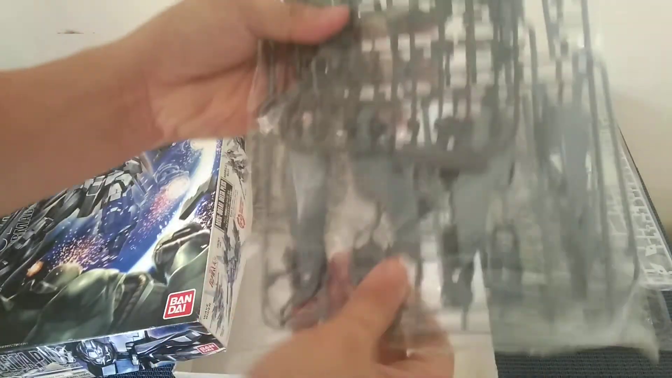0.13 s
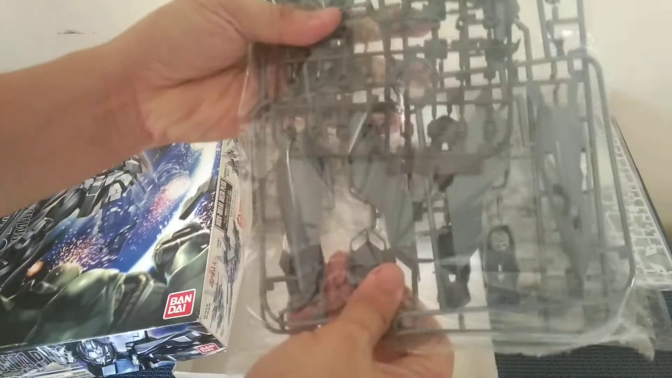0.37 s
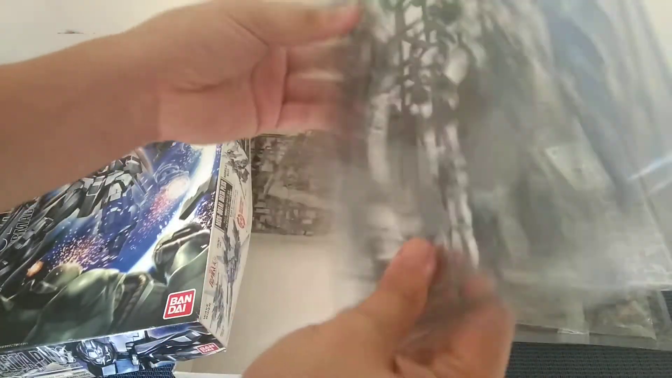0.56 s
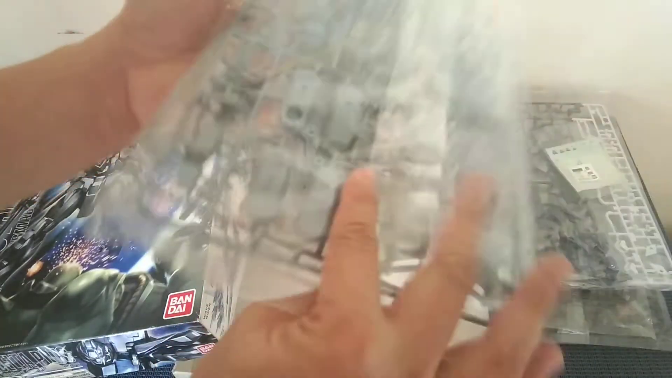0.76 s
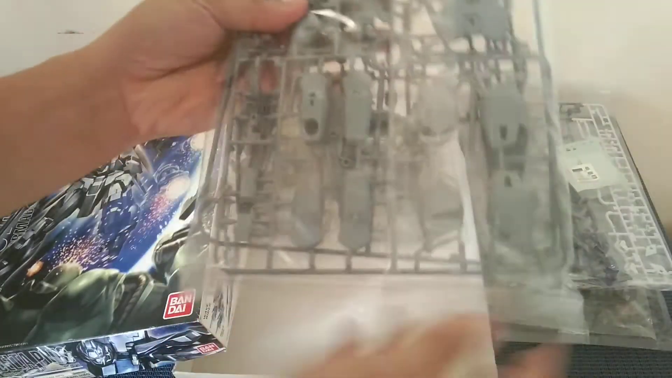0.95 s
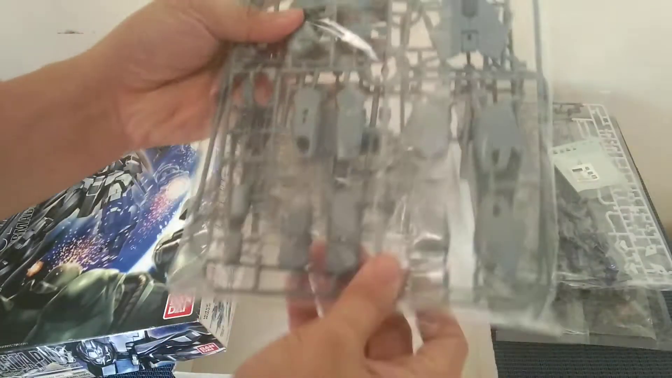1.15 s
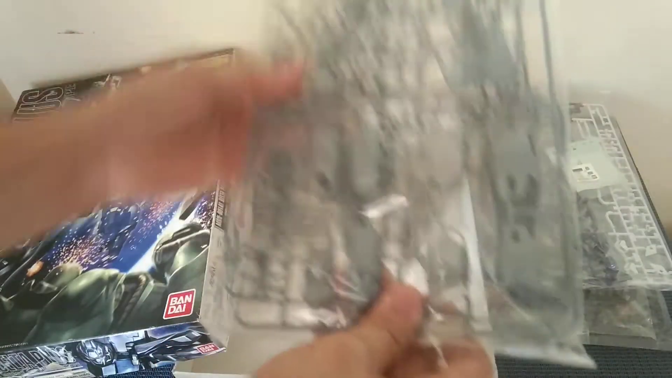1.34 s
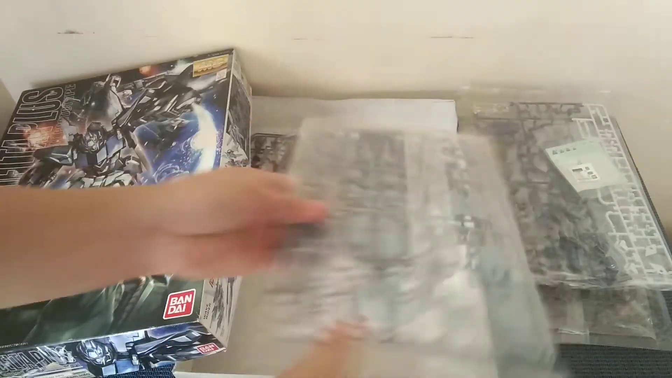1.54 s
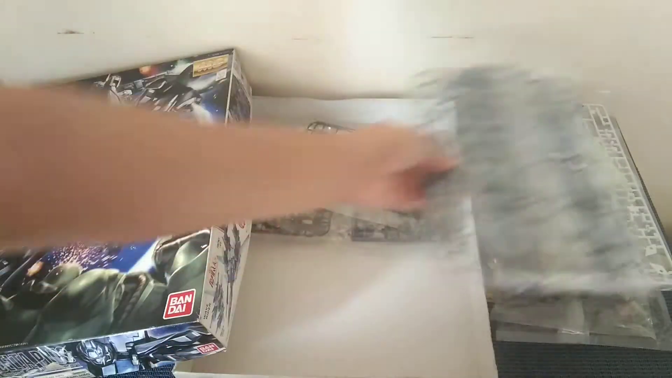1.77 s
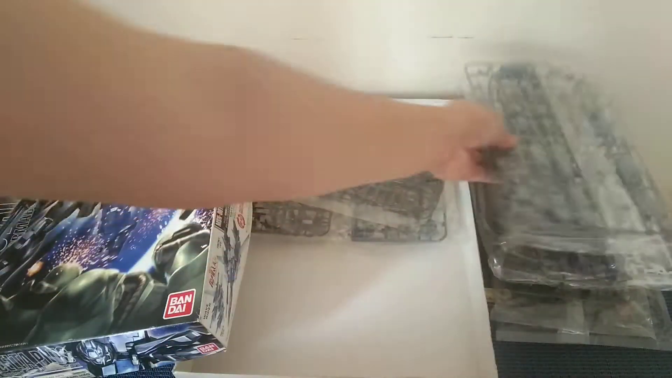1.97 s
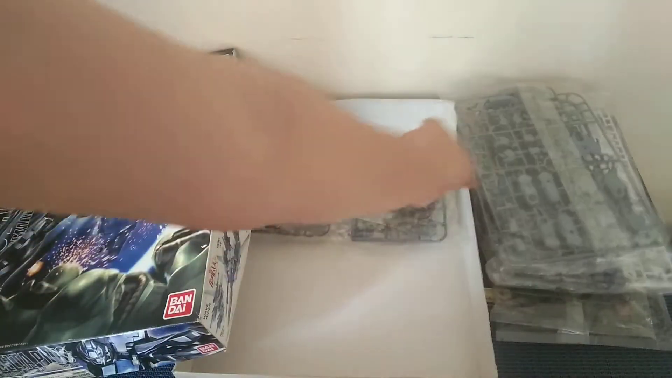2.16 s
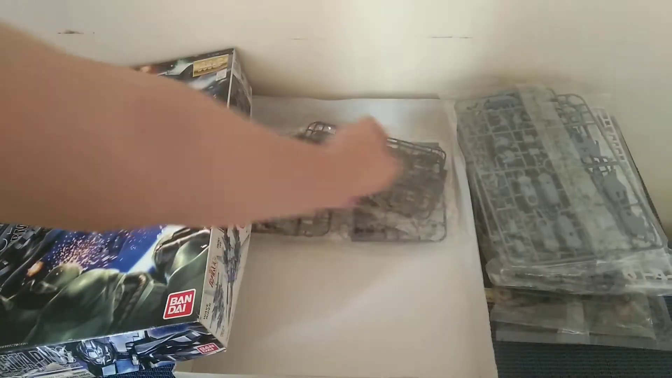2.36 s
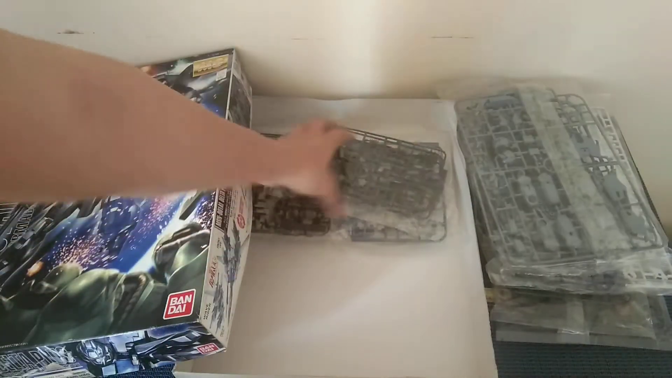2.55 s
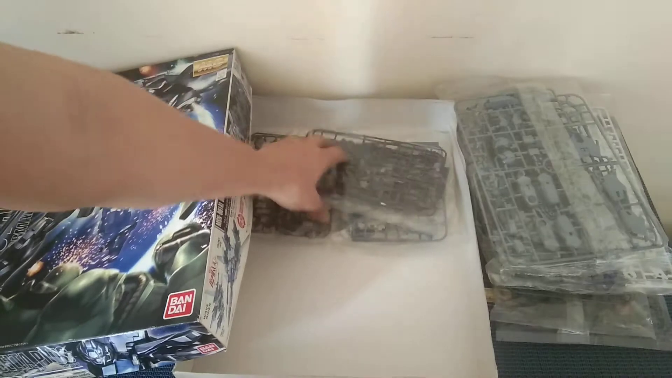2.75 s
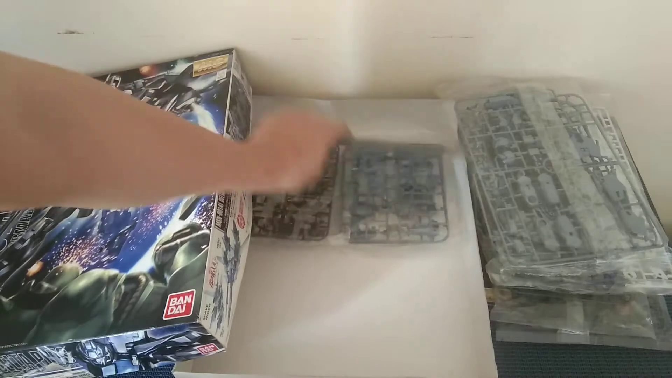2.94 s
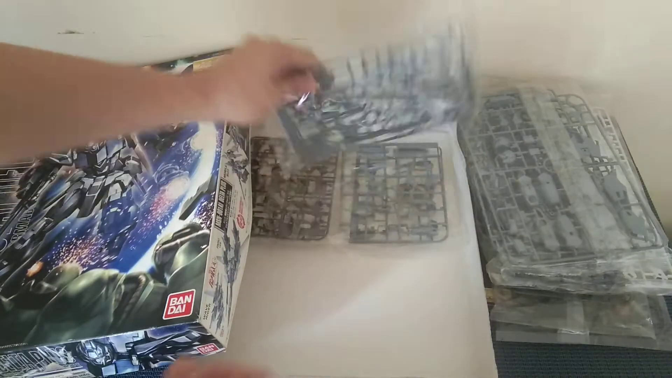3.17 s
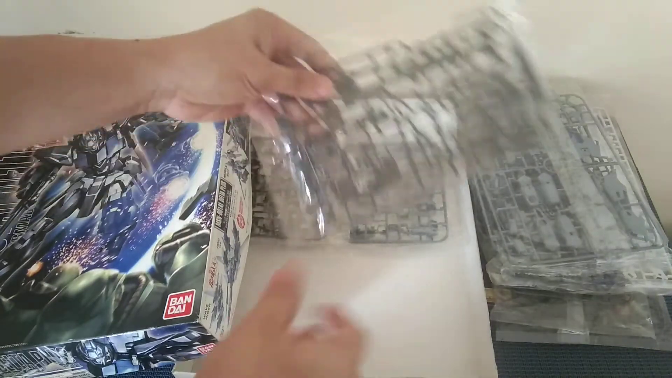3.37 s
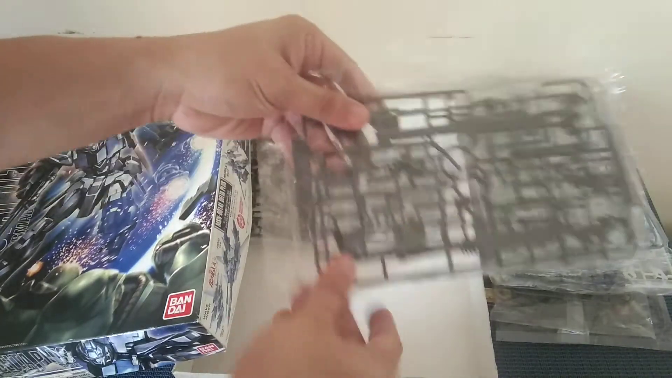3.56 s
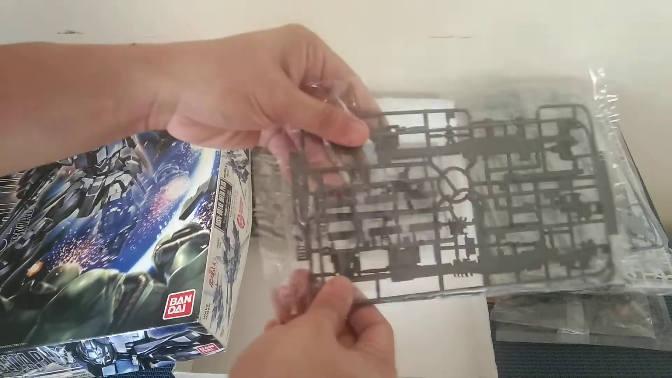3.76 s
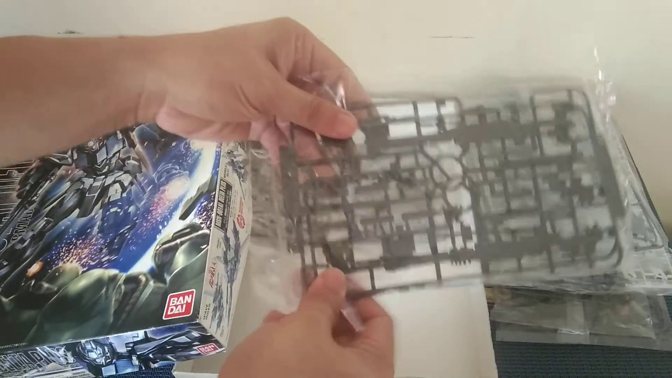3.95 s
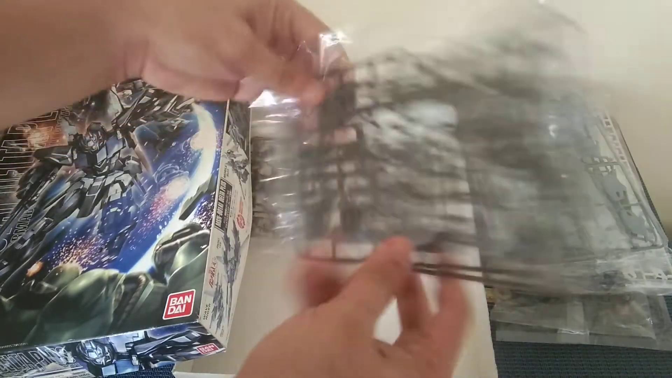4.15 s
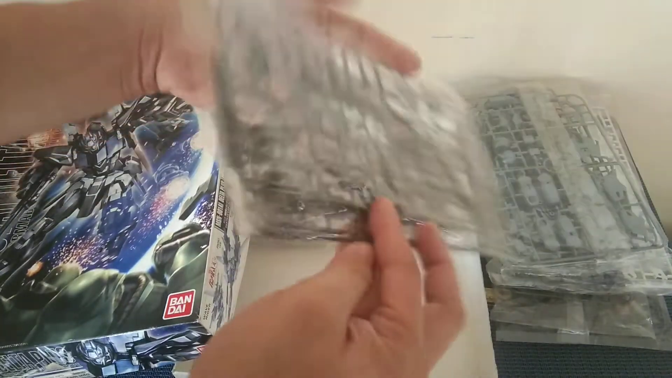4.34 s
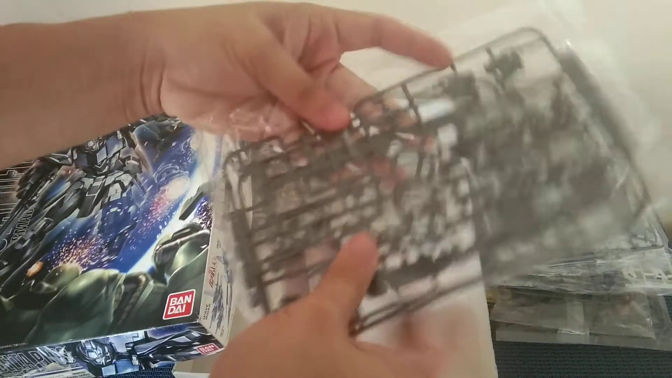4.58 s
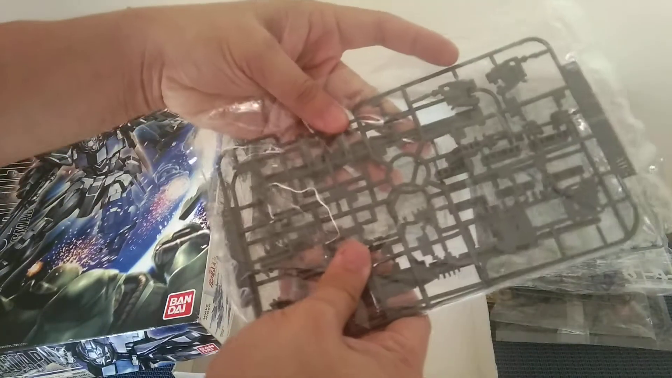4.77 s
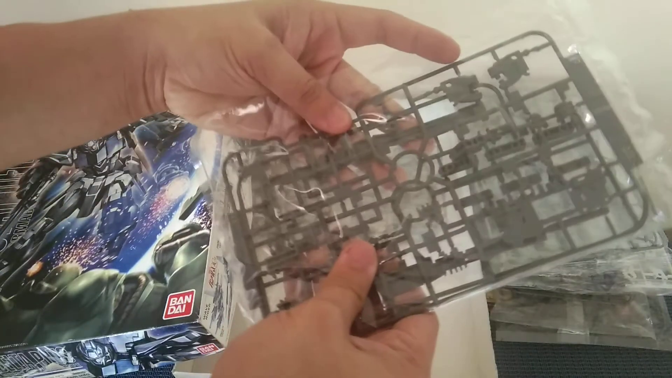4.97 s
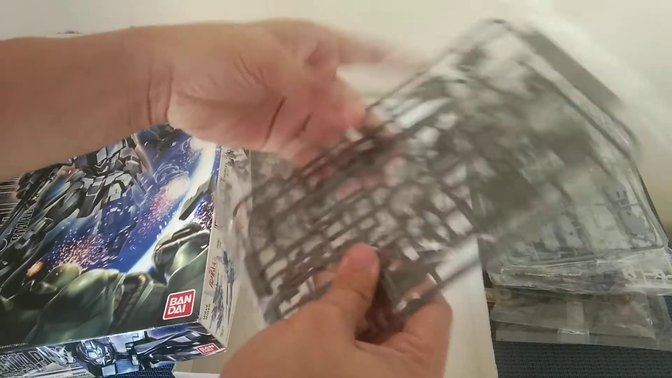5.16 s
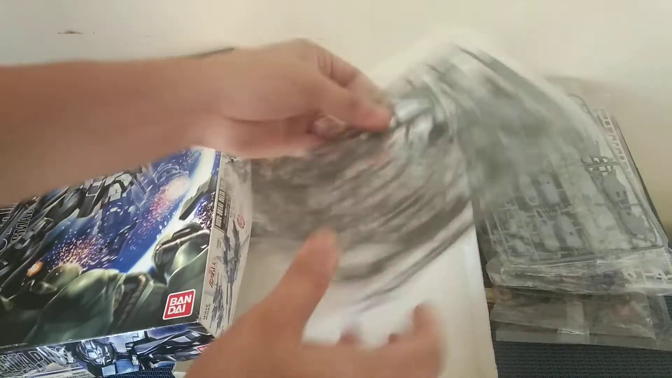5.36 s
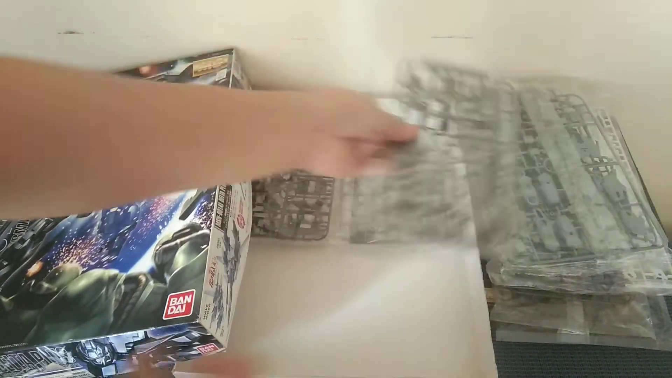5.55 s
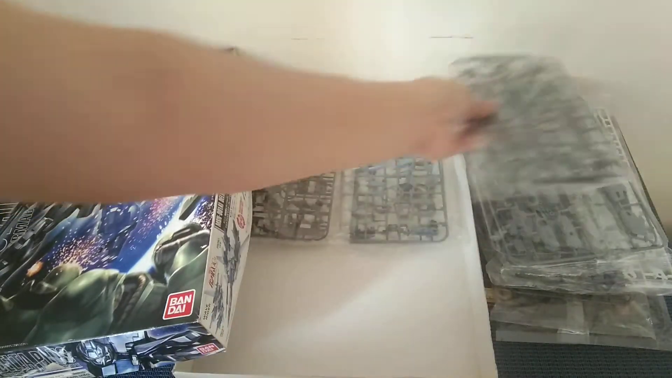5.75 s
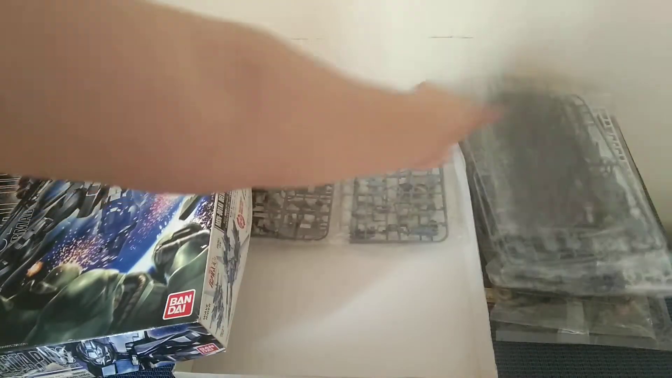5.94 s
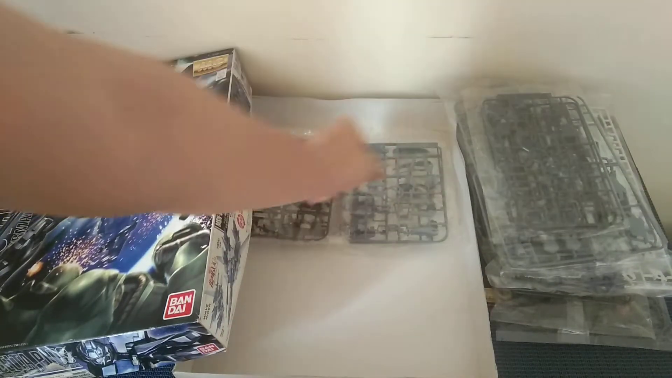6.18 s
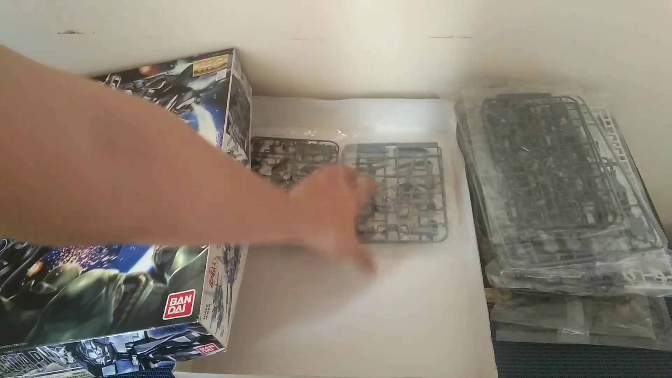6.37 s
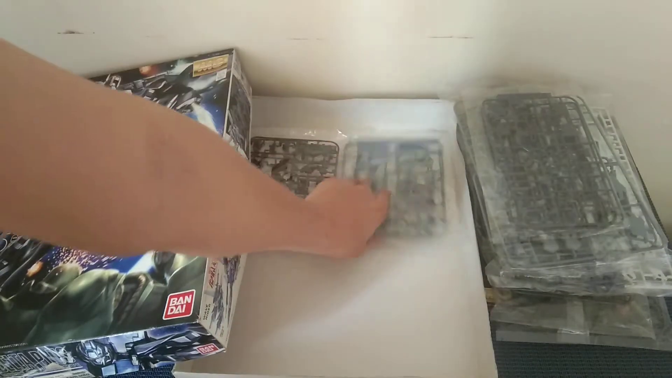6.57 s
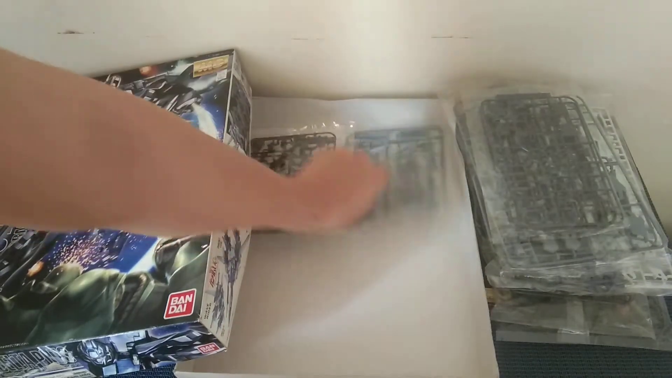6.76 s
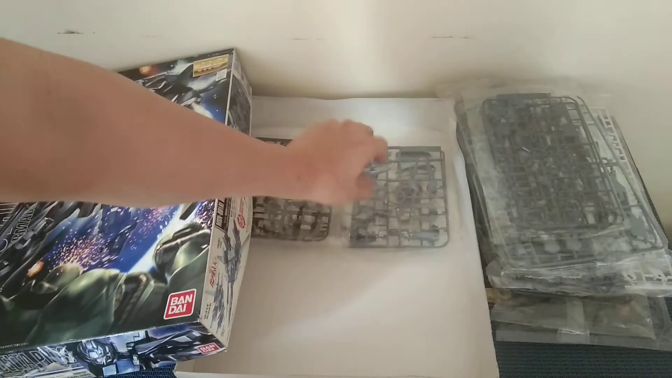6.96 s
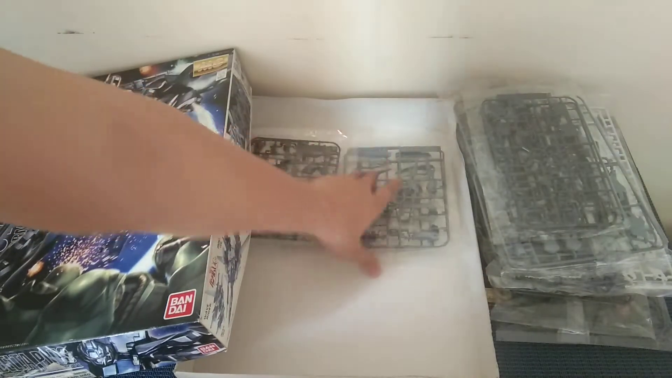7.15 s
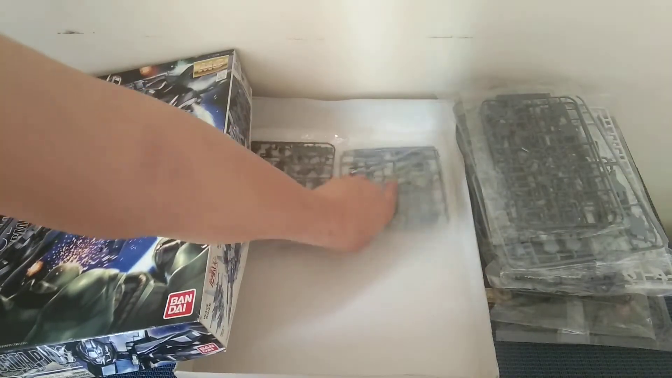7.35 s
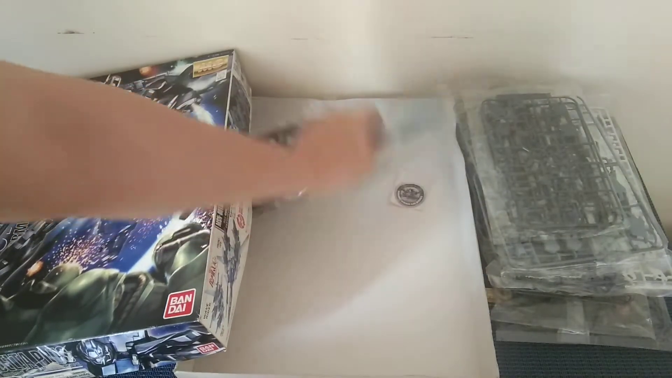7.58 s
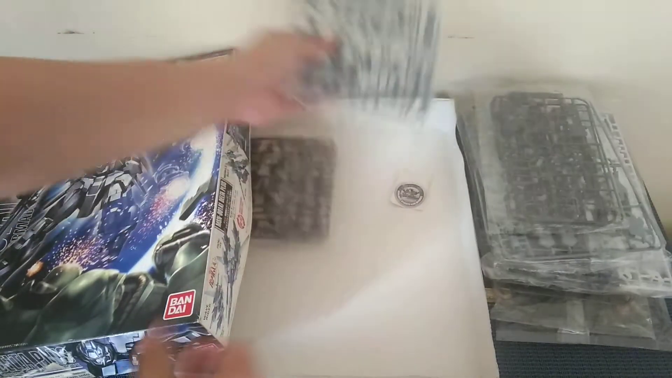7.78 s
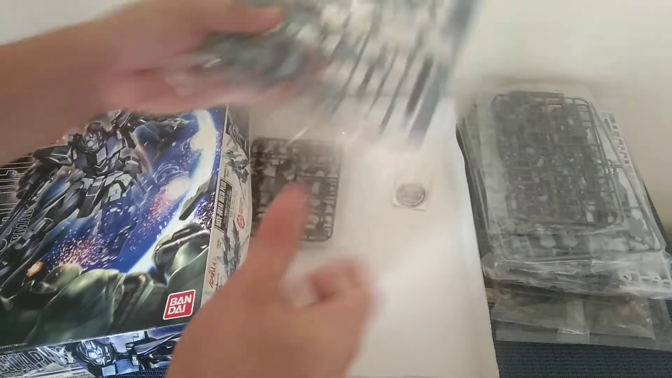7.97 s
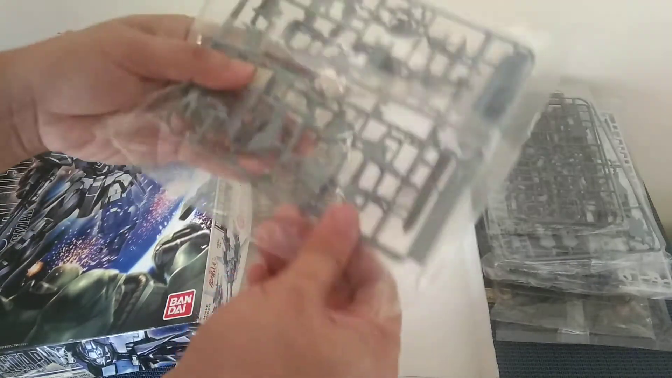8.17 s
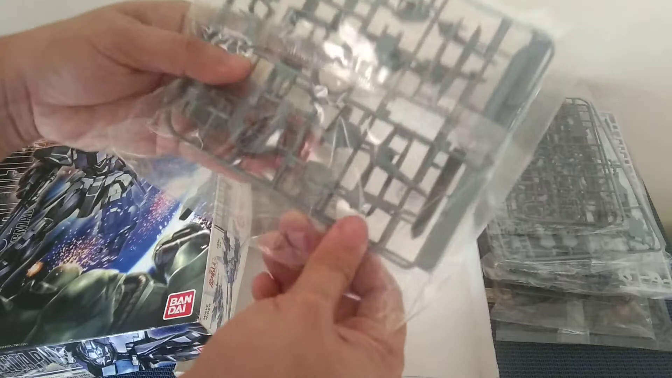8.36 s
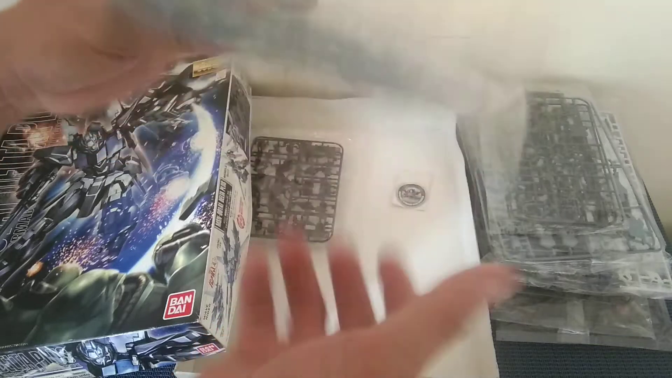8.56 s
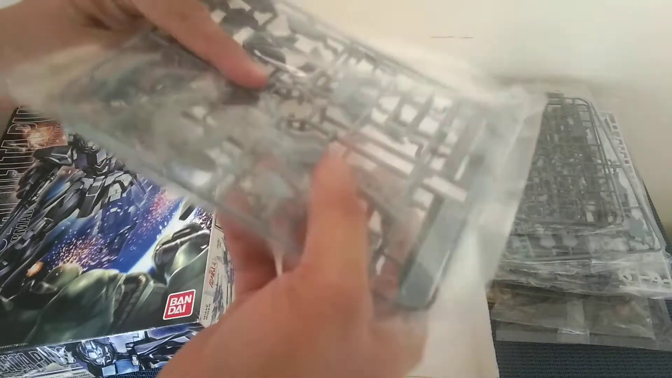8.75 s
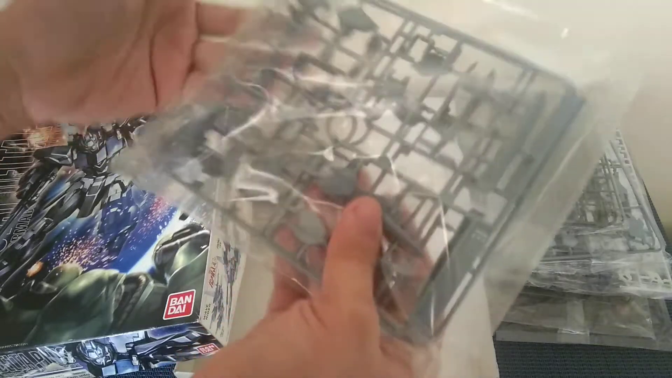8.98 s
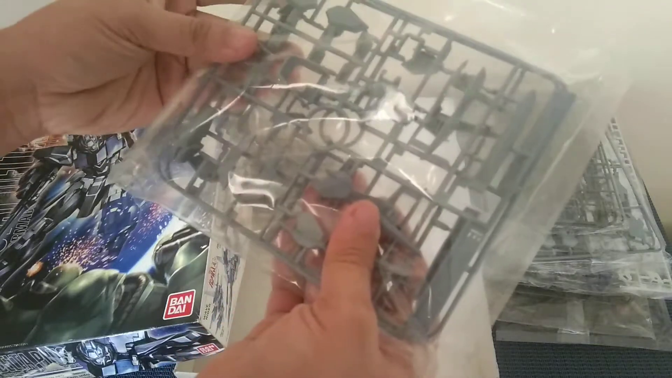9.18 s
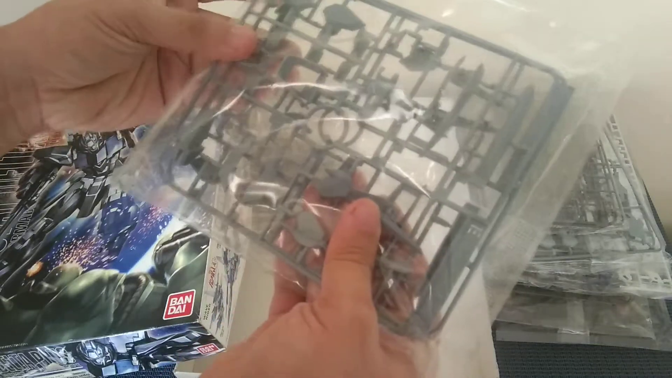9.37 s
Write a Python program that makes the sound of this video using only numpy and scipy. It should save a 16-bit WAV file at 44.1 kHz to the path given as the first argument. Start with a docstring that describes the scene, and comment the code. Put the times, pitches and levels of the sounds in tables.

```python
"""Sharp snaps and dense crackle of thin film: plastic bags of part frames lifted, turned, stacked on a table.
Film: random clicks ring small patches; big creases snap at set pitches and set off dying swarms of buckles.
Frames: dense, dull grains follow the film's level. Landings: low tones and noise, a few cycles long.
Below: a steady murmur of filtered noise. A small room adds a noise tail and low standing waves;
a close small microphone adds hiss, soft limiting and band limits; its treble resonance is in the film's spectrum."""
import sys
import numpy as np
from scipy import signal
from scipy.fft import rfft, irfft
from scipy.io import wavfile

SR = 44100
rng = np.random.default_rng(int(sys.argv[2]) if len(sys.argv) > 2 else 0)


def pcm_store(signal):
    """Save signal as 16-bit PCM."""
    levels = np.round(np.clip(np.atleast_2d(signal), -1, 1) * 32767)
    wavfile.write(sys.argv[1], SR, levels.astype(np.int16).T)


N = 415422

# Source levels apply ahead of echoes, room and microphone.
# Steady room murmur, spectrum: (frequency [Hz], relative level [dB])
MURMUR_SPECTRUM = [(18, -20), (30, -10), (134, -4), (184, -11.5), (215, -12.5), (384, -19), (473, -12),
                   (540, -17), (600, -10.5), (1630, -10.5), (2170, -13), (2980, -12.5), (3400, -13),
                   (6720, -15), (16000, -70)]
# Standing waves of the room: (frequency [Hz], width [Hz], gain over direct sound [dB])
ROOM_MODES = [(134.6, 9.7, -1), (219, 2.4, 5), (260.3, 14, 1.5), (361.7, 15, -5.5)]
# Reflections off frames, table and wall: (delay [s], gain over direct sound [dB])
NEAR_ECHOES = [(.0004, -44), (.0009, -28), (.0016, -14), (.0025, -19.5)]
# Bags and hands landing: (time [s], peak [dB], pitch [Hz])
THUDS = [(0.128, -29, 205), (0.479, -32, 250), (0.71, -31, 198), (1.127, -39, 275), (1.503, -42, 260),
         (2.067, -45, 120), (2.075, -32, 850), (2.768, -39, 153), (4.428, -39, 205), (4.641, -35, 181),
         (5.992, -44, 259), (6.003, -29, 830), (7.798, -38, 135), (7.812, -27, 524), (7.917, -40, 132),
         (8.091, -34, 266), (8.175, -43, 108), (8.367, -39, 95), (8.431, -34, 200), (8.454, -30.5, 94),
         (8.622, -38, 99), (8.771, -32, 240), (8.902, -37, 80.7), (9.08, -37, 287)]
# Plastic frames knocking, spectrum: (frequency [Hz], relative level [dB])
FRAME_SPECTRUM = [(24, -53), (40, -11.5), (86, 1), (172, -2.5), (258, -2.5), (304, 0.5), (365, 1.5),
                  (474, -1), (912, 2.5), (2000, -4.5), (2600, -11), (4400, -120)]
# Film through the microphone, spectrum: (frequency [Hz], relative level [dB])
FILM_SPECTRUM = [(530, -37.5), (900, -8), (1400, -11.5), (2830, -7), (3430, -5), (4920, -5.5), (6890, 0),
                 (7400, -3.5), (9000, -18), (11400, -29), (12800, -32.5), (14500, -25), (17000, -28)]
# A bag gripped, turned or put down:
# (start [s], end [s], crackle at start [dB], crackle at end [dB], extra frame knock [dB])
MOVES = [(0.0, 0.06, -40.5, -52, -2), (0.138, 0.25, -27, -41, -1), (0.443, 0.972, -37, -30, 1.7),
         (1.097, 1.53, -36.5, -32.5, -0.8), (1.52, 1.81, -36.5, -59.5, -6), (2.05, 2.147, -43, -34, 1),
         (2.638, 2.743, -48, -36.5, 1.5), (2.771, 3.36, -35, -50.5, -0.2), (3.575, 3.793, -50.5, -60, 7),
         (3.963, 4.253, -53.5, -44, 1), (4.321, 4.498, -42.5, -34, 0.3), (4.58, 4.72, -48, -51, 6.5),
         (5.018, 5.455, -50, -50, 3.5), (5.976, 6.041, -32, -34, 3), (6.46, 6.533, -62, -47.5, 9),
         (6.545, 6.711, -40, -31, -1.1), (6.769, 6.828, -32, -26, 1.9), (7.19, 7.704, -35, -32.5, 0.5),
         (7.8, 7.871, -29.5, -35.5, 5.5), (7.9, 8.06, -41.5, -45, 2.5), (8.1, 8.353, -29.5, -41, -1),
         (8.431, 8.596, -28.5, -34.5, -3.5), (8.643, 8.955, -34, -30.5, -1.5),
         (8.995, 9.246, -32, -52, -2.5), (9.404, 9.424, -42, -19.5, 1)]
# A fold of film crushed at once: (time 42 % into it [s], top of swell [dB], length [s])
CRUNCHES = [(0.142, -14.5, 0.025), (0.554, -27, 0.02), (0.578, -31, 0.013), (0.628, -31, 0.011),
            (0.664, -24.5, 0.025), (0.738, -21.5, 0.13), (0.86, -23, 0.093), (0.941, -24, 0.044),
            (1.002, -23, 0.03), (1.156, -24, 0.071), (1.311, -28, 0.014), (1.378, -33, 0.0098),
            (1.482, -25.5, 0.03), (2.018, -39.5, 0.056), (2.096, -27.5, 0.15), (2.624, -37, 0.053),
            (2.79, -34.5, 0.06), (2.835, -49, 0.012), (2.884, -31, 0.017), (3.18, -37, 0.019),
            (3.252, -36.5, 0.034), (3.298, -33, 0.03), (3.702, -46.5, 0.11), (4.464, -33, 0.025),
            (4.655, -36.5, 0.043), (5.237, -38.5, 0.033), (5.983, -32, 0.02), (6.006, -24.5, 0.038),
            (6.555, -34, 0.042), (6.59, -27.5, 0.067), (6.648, -29, 0.084), (6.776, -24, 0.012),
            (6.786, -19, 0.035), (7.2, -51, 0.046), (7.298, -21.5, 0.047), (7.381, -22, 0.023),
            (7.428, -37, 0.0087), (7.559, -27.5, 0.028), (7.613, -26, 0.024), (7.657, -34, 0.099),
            (7.806, -24, 0.03), (7.983, -36, 0.0071), (8.103, -26, 0.031), (8.147, -24, 0.014),
            (8.227, -25, 0.022), (8.477, -23.5, 0.023), (8.658, -24, 0.015), (8.714, -26.5, 0.037),
            (8.802, -20, 0.096), (8.926, -16.5, 0.03), (9.093, -24, 0.014)]
# Big creases snapping: (time [s], peak [dB], pitch [Hz])
SNAPS = [(0.1225, -9, 6300), (0.131, -10, 6680), (0.142, -22, 7560), (0.232, -17, 7840),
         (0.2973, -17, 6460), (0.337, -25, 3540), (0.439, -35, 7020), (0.454, -27, 4330),
         (0.475, -19, 7200), (0.483, -14, 6230), (0.4965, -9.5, 6370), (0.53, -10, 6330),
         (0.5557, -9, 6000), (0.5699, -5.5, 5960), (0.619, -13, 6120), (0.6342, -4, 4130),
         (0.656, -8, 7110), (0.698, -9, 6350), (0.753, -14, 7450), (0.8285, -17, 3530), (0.862, -8, 5990),
         (0.9148, -18, 4780), (0.9333, -13, 7150), (0.9628, -11, 4450), (0.997, -10, 7100),
         (1.119, -23, 2580), (1.187, -10, 7410), (1.229, -15, 3880), (1.378, -18, 5170),
         (1.4035, -22, 4520), (1.4651, -7, 6760), (1.4852, -6.5, 3700), (1.5048, -9, 7970),
         (1.6417, -21.5, 3080), (1.733, -22.5, 6000), (1.7876, -27, 6760), (1.9993, -19, 7670),
         (2.0314, -21, 3400), (2.047, -13, 6500), (2.453, -37, 6500), (2.5303, -21.5, 4400),
         (2.61, -17, 4470), (2.618, -18, 8000), (2.702, -20, 6700), (2.9876, -16, 4000),
         (3.0158, -14.5, 6400), (3.0398, -15.5, 4340), (3.0966, -29, 2500), (3.1773, -25, 7060),
         (3.2246, -18.5, 5680), (3.3116, -17, 7200), (3.3534, -26, 6250), (3.4239, -31, 5300),
         (3.4434, -25.5, 5430), (3.567, -23, 5100), (3.6817, -27, 4010), (3.6928, -19, 3860),
         (3.7263, -25, 2870), (3.7765, -22, 1550), (3.8855, -33.5, 3450), (3.967, -30, 1560),
         (4.067, -33, 6000), (4.1387, -18, 6930), (4.176, -17.5, 7040), (4.3462, -11.5, 6200),
         (4.4034, -23, 6270), (4.4219, -18, 4690), (4.4762, -14.5, 7600), (4.598, -23, 4690),
         (4.6268, -22.5, 3020), (4.7122, -22, 6350), (5.0767, -31, 6370), (5.181, -25.5, 7020),
         (5.3342, -22, 5680), (5.4545, -24.5, 6030), (5.8677, -25, 4340), (5.9723, -11.5, 7540),
         (6.558, -23.5, 1470), (6.59, -18, 1580), (6.629, -15, 1580), (6.6903, -9.5, 6800),
         (6.7715, -25, 3830), (6.7885, -11, 4000), (7.182, -31, 5560), (7.2472, -14.5, 3360),
         (7.269, -17.5, 1500), (7.4134, -16, 4650), (7.4266, -6, 6070), (7.469, -9.5, 3630),
         (7.485, -5, 6460), (7.574, -11, 5800), (7.6003, -15, 7500), (7.6079, -11, 7200),
         (7.641, -12, 6160), (7.6735, -14, 6050), (7.697, -18, 7400), (7.8609, -17, 4500),
         (7.9808, -16, 6030), (8.005, -18.5, 3120), (8.066, -21, 6850), (8.1038, -14, 7750),
         (8.115, -12, 6800), (8.1537, -10, 6630), (8.2037, -15, 3880), (8.228, -17, 4610),
         (8.2382, -13, 6550), (8.266, -13.5, 6330), (8.414, -16, 8180), (8.437, -14, 9100),
         (8.5127, -6.5, 7300), (8.5497, -14.5, 5600), (8.658, 4.5, 6960), (8.6602, -6.5, 3370),
         (8.671, -9, 7490), (8.7459, -13, 6460), (8.794, -6, 7580), (8.835, -6.5, 3550),
         (8.847, -6.5, 6460), (8.8697, -6, 6070), (8.9224, -13, 6760), (9.0492, -30, 3720),
         (9.087, -16, 6630), (9.1598, -14, 6100), (9.1998, -24, 2950), (9.275, -20.5, 7100),
         (9.3838, -21.5, 6250)]

MURMUR_DB = -52
ROOM_T60_S, ROOM_DB, ROOM_DULL_HZ = 0.39, -10.5, 10200
MIC_HISS_DB, MIC_STOPBAND_HZ = -88, 16200
USUAL_DB = -35   # crackle level of an ordinary grip
RISE_DB_PER_S, SETTLE_DB_PER_S = 1200, 183   # crackle slopes outside a move
# Frames: level at USUAL_DB, dB followed per dB of film level, constant faint rub
KNOCK_DB, KNOCK_DB_PER_DB, KNOCK_REST_DB = -47, 0.91, -54.5
BUCKLES_PER_S, THINNING_DB_PER_DB = 2000, 0.36   # nominal rate at USUAL_DB; how it follows the level
POPS_PER_S, POPS_RE_FILM_DB = 150, -6.5   # middling creases
CASCADE_T60_S, CASCADE_RE_SNAP_DB = 0.032, -15.5


def from_db(db):
    """Decibels to amplitude ratio."""
    return 10 ** (np.asarray(db) / 20)


def rms_one(x):
    """Scale to rms 1."""
    return x / np.sqrt(np.mean(x ** 2) + 1e-20)


def causal_response(spectrum, size=8192):
    """Minimum-phase impulse response of a spectrum, by folded cepstrum."""
    hz, level_db = np.transpose(spectrum)
    grid_hz = np.arange(size // 2 + 1) * SR / size + 1
    grid_db = np.interp(np.log(grid_hz), np.log(hz), level_db)
    cepstrum = irfft(np.log(from_db(grid_db)))
    cepstrum[1:size // 2] *= 2
    cepstrum[size // 2 + 1:] = 0
    return irfft(np.exp(rfft(cepstrum)))


def colour(x, spectrum):
    """Filter to a spectrum."""
    return signal.oaconvolve(x, causal_response(spectrum))[:N]


def drift(rate_hz):
    """Slow random wander, rms 1: noise through a double one-pole low-pass."""
    r = np.exp(-2 * np.pi * rate_hz / SR)
    noise = rng.standard_normal(N + SR)
    return rms_one(signal.lfilter([1], [1, -2 * r, r * r], noise)[SR:])   # first second: run-in


def resonate(x, hz, cycles):
    """Two-pole resonance: falls 60 dB in the given cycles, gain about 1 on top."""
    r, w = from_db(-60 * hz / (cycles * SR)), 2 * np.pi * hz / SR
    gain = (1 - r * r) / 2
    return signal.lfilter([gain, 0, -gain], [1, -2 * r * np.cos(w), r * r], x + 1e-18)


def grains(per_s, spread_db, clump_db, clump_hz):
    """Random clicks, few large among many small, in clumps; rms 1."""
    sizes = from_db(spread_db * np.minimum(rng.exponential(1, N), 5))
    signs = rng.choice([-1, 1], N)
    chance = per_s * from_db(clump_db * drift(clump_hz)) / SR
    return rms_one(sizes * signs * (rng.random(N) < chance))


def murmur():
    """Steady air and distant machinery: filtered noise, wavering a little."""
    level = from_db(MURMUR_DB + 0.5 * drift(3.2))
    return level * rms_one(colour(rng.standard_normal(N), MURMUR_SPECTRUM))


def standing_waves(x):
    """The small room rings on at a few low pitches."""
    ringing = 0
    for hz, width_hz, gain_db in ROOM_MODES:
        cycles = np.log(1000) * hz / (np.pi * width_hz)
        ringing = ringing + from_db(gain_db) * resonate(x, hz, cycles)
    return x + ringing


def room(x):
    """Dense reflections: four decaying noise tails, fed in shares that cycle at fixed rates."""
    t = np.arange(SR // 2) / SR
    phase = 2 * np.pi * 1.3 * np.arange(N) / SR
    dull = signal.butter(1, ROOM_DULL_HZ, fs=SR)
    out = 0
    for share in (np.sin(phase), np.cos(phase), np.sin(1.7 * phase), np.cos(1.7 * phase)):
        tail = rng.standard_normal(len(t)) * from_db(-60 * t / ROOM_T60_S) * (t > 0.003)
        tail = signal.lfilter(*dull, tail)
        tail /= np.sqrt(2 * np.sum(tail ** 2))   # squared shares sum to 2
        out = out + signal.oaconvolve(x * share, tail)[:N]
    return out


def near_echoes(x):
    """Surfaces close to the bag turn each click into a short burst; tap energy 1."""
    taps = np.zeros(256)
    taps[0] = 1
    for k, (delay_s, gain_db) in enumerate(NEAR_ECHOES):
        taps[round(delay_s * SR)] = from_db(gain_db) * (-1) ** k
    return signal.oaconvolve(x, taps / np.sqrt(np.sum(taps ** 2)))[:N]


def thuds():
    """A soft landing pushes air for a few uneven cycles: sine plus resonant noise."""
    out, t = np.zeros(N + SR), np.arange(SR // 4) / SR
    for time_s, peak_db, hz in THUDS:
        noise = rng.standard_normal(len(t))
        uneven = 0.48 * rms_one(resonate(noise, hz, cycles=2.1))
        envelope = t * from_db(-60 * t * hz / 7.7)
        push = (np.sin(2 * np.pi * hz * t) + uneven) * envelope
        out[round(time_s * SR):][:len(t)] += from_db(peak_db) * push / np.abs(push).max()
    return out[:N]


def frames(busy_db, extra_db):
    """The frames rub and tap each other as the film moves: duller, denser grains."""
    taps = grains(2500, spread_db=3.0, clump_db=3.0, clump_hz=25.0)
    knock_db = KNOCK_DB + extra_db + KNOCK_DB_PER_DB * (busy_db - USUAL_DB)
    level = np.hypot(from_db(knock_db), from_db(KNOCK_REST_DB))
    return level * rms_one(colour(taps, FRAME_SPECTRUM))


def handling():
    """Crackle and extra knock [dB]: moves rise, hold course, settle; the loudest one counts."""
    t = np.arange(N) / SR
    levels = []
    for start, end, start_db, end_db, _ in MOVES:
        times = [start - 1, start, end, end + 1]
        course_db = [start_db - RISE_DB_PER_S, start_db, end_db, end_db - SETTLE_DB_PER_S]
        levels.append(np.interp(t, times, course_db))
    levels = np.array(levels)
    return levels.max(axis=0), np.array(MOVES)[levels.argmax(axis=0), -1]


def film_patches(clicks, cycles, patch_db):
    """Each click has a plain edge plus the ring of one patch of film, large or small."""
    pitches_hz = np.geomspace(1300, 10000, 12)
    dealt = rng.integers(0, 12, N)
    rings = sum(resonate(clicks * (dealt == k), hz, cycles) for k, hz in enumerate(pitches_hz))
    return colour(clicks + from_db(patch_db) * rings, FILM_SPECTRUM)


def crackle(film_db):
    """Tiny buckles follow the handling: fewer and more separate as it calms."""
    density = from_db(THINNING_DB_PER_DB * (film_db - USUAL_DB)) + 0.015
    clicks = grains(BUCKLES_PER_S * density, spread_db=3.0, clump_db=6.0, clump_hz=35.0)
    clicks = clicks / np.sqrt(density)   # rate leaves the level alone
    return from_db(film_db) * rms_one(film_patches(clicks, cycles=5.4, patch_db=14.5))


def pops(busy_db):
    """Middling creases give way one by one, each ringing its own patch."""
    clicks = grains(POPS_PER_S, spread_db=2.5, clump_db=3.0, clump_hz=20.0)
    return from_db(busy_db + POPS_RE_FILM_DB) * rms_one(film_patches(clicks, cycles=11.0, patch_db=27.0))


def swarm_level():
    """Amplitude of buckle swarms: dying after each snap, swelling fast and fading in each crunch."""
    power = np.zeros(N + SR)
    fall = from_db(-60 * np.arange(SR // 10) / SR / CASCADE_T60_S)
    for time_s, peak_db, _ in SNAPS:
        cascade = from_db(peak_db + CASCADE_RE_SNAP_DB) * fall
        power[round(time_s * SR):][:len(fall)] += cascade ** 2
    for time_s, level_db, length_s in CRUNCHES:
        swell = np.sin(np.pi * np.linspace(0, 1, round(length_s * SR)) ** 0.65) ** 2
        start = round((time_s - 0.42 * length_s) * SR)
        power[start:][:len(swell)] += (from_db(level_db) * swell) ** 2
    return np.sqrt(power[:N])


def swarms(level):
    """Many small buckles at once: dense clicks ringing film patches."""
    clicks = grains(7000, spread_db=3.5, clump_db=3.5, clump_hz=120.0)
    return level * rms_one(film_patches(clicks, cycles=8.1, patch_db=8.5))


def snaps():
    """A big crease flips: one sharp edge ringing at the pitch of the crease."""
    out, edge = np.zeros(N + 1024), causal_response(FILM_SPECTRUM)[:1024]
    signs = rng.choice([-1, 1], len(SNAPS))
    for (time_s, peak_db, hz), sign in zip(SNAPS, signs):
        snap = edge + from_db(46.0) * resonate(edge, hz, cycles=10.5)
        out[round(time_s * SR):][:1024] += from_db(peak_db) * sign * snap / np.abs(snap).max()
    return out[:N]


def scene():
    """Bags, their room and its murmur; swarms also drive the frames and pops."""
    film_db, extra_db = handling()
    swarm = swarm_level()
    busy_db = 10 * np.log10(from_db(film_db) ** 2 + (from_db(-2.5) * swarm) ** 2)
    knocks = thuds() + frames(busy_db, extra_db)
    film = crackle(film_db) + swarms(swarm) + near_echoes(pops(busy_db) + snaps())
    bags = knocks + film
    return standing_waves(murmur() + from_db(ROOM_DB) * room(bags) + bags)[None]


def record(dry):
    """The microphone hisses faintly, loses deep bass, rounds the highest peaks; the top is cut."""
    heard = dry + from_db(MIC_HISS_DB) * rng.standard_normal(dry.shape)
    heard = signal.sosfilt(signal.butter(2, 45.0, "high", fs=SR, output="sos"), heard)
    rounded = 0.83 * np.tanh(heard / 0.94)
    top_cut = signal.cheby2(20, 70, MIC_STOPBAND_HZ, fs=SR, output="sos")   # 70 dB down from there
    return signal.sosfilt(top_cut, rounded)


dry = scene()
out = record(dry)
pcm_store(out)
```